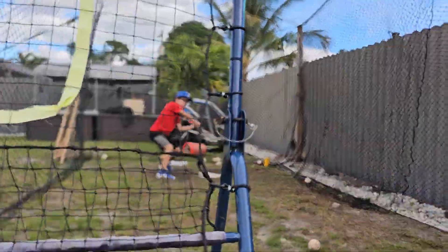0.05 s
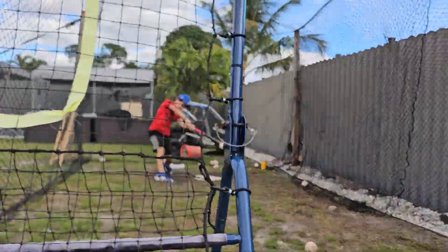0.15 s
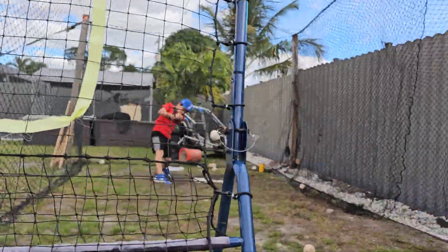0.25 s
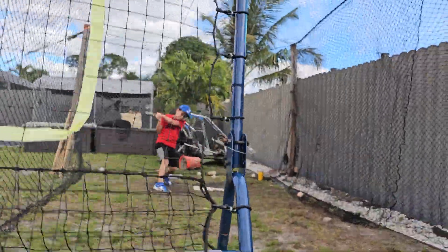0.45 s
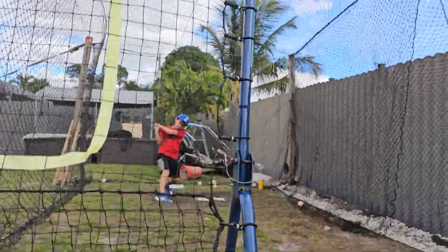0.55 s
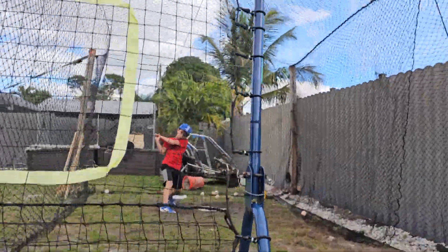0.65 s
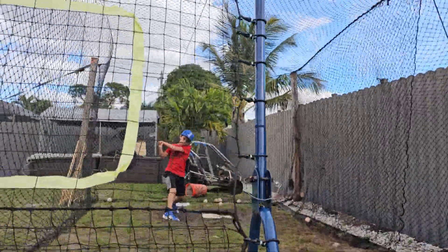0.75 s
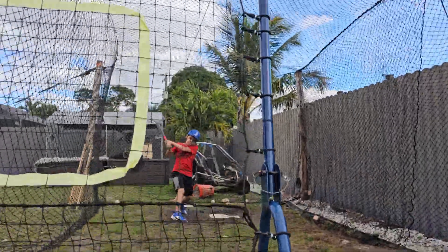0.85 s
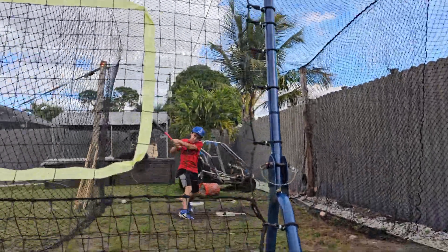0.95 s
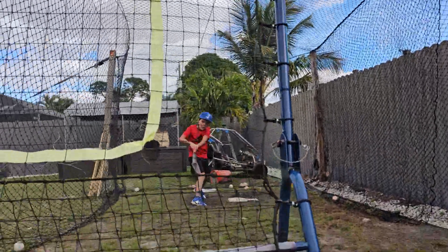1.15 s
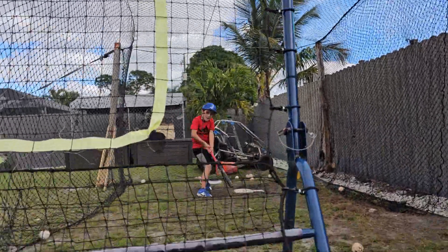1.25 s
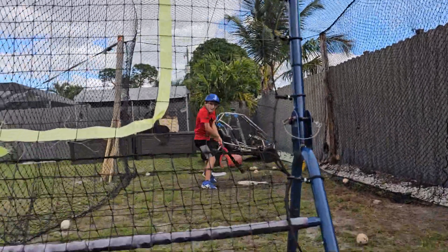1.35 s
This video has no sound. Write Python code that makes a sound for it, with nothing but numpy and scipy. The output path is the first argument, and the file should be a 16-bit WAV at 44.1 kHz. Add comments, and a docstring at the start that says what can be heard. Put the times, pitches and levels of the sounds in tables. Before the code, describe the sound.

A ball crashes into close netting, rattling and booming its tube frame, right after a faint machine thump and a sharp bat crack farther off. The ball thuds onto the grass, with faint distant traffic behind the yard.

```python
"""A batted ball slams into a net screen beside the microphone, in a backyard batting cage.
One cord snaps taut, the net rustles, the tube frame rattles and booms, the ball drops on the grass.
Just before, from across the yard, the pitching machine thumps and the bat cracks; the fences answer
with echoes and a short tail. Distant traffic rumble and air lie under it all."""
import sys
import numpy as np
from scipy import signal
from scipy.fft import rfft, irfft, next_fast_len
from scipy.io import wavfile
from scipy.ndimage import uniform_filter1d

SR = 44100
rng = np.random.default_rng(int(sys.argv[2]) if len(sys.argv) > 2 else 0)


def unload_wav(signal):
    """Save mono or channel-first audio to the path in sys.argv[1] as 16-bit WAV at rate SR, clipped to [-1, 1]."""
    wavfile.write(
        sys.argv[1],
        SR,
        np.round(np.clip(np.atleast_2d(signal).T, -1, 1) * 32767).astype(np.int16),
    )


N = 61739


def amp(db):
    return 10 ** (np.asarray(db) / 20)


def unit(x):
    return x / np.sqrt(np.mean(x ** 2) + 1e-20)


def along(points, hz):
    """Interpolate (Hz, value) points on a log axis."""
    f, v = np.transpose(points)
    return np.interp(np.log(hz + 1), np.log(f + 1), v)


def curves(rows):
    """A gate that opens at the first row and fades around the last, then each column per sample."""
    s, *cols = np.transpose(rows)
    t = np.arange(N) / SR
    gate = np.clip((t - s[0]) / 0.0024, 0, 1) * np.clip((s[-1] + 0.19 - t) / 0.22, 0, 1)
    return [gate] + [np.interp(t, s, c) for c in cols]


def filtered(x, response):
    """x through a complex frequency response."""
    m = next_fast_len(N + SR // 2)
    return irfft(rfft(x, m) * response(np.fft.rfftfreq(m, 1 / SR)), m)[..., :N]


def peak(f, centre_hz, width_hz):
    """A causal resonance."""
    return 1j * f * width_hz / (centre_hz ** 2 - f * f + 1j * f * width_hz + 1e-9)


def coloured(x, spectrum):
    """x at unit RMS, shaped by a spectrum that goes to -60 dB an octave beyond its ends."""
    points = [(spectrum[0][0] / 2, -60), *spectrum, (spectrum[-1][0] * 2, -60)]
    return unit(filtered(x, lambda f: amp(along(points, f))))


def stereo(rows, likeness, lag_s=0):
    """Mix two signals to a pair of given likeness; left arrives lag_s after right."""
    turn = lambda f: np.arccos(np.clip(along(likeness, f), -1, 1)) / 2
    mid, side = filtered(rows, lambda f: np.array([np.cos(turn(f)), np.sin(turn(f))]))
    lag = lambda f: np.exp(-1j * np.pi * f * lag_s * np.array([[1], [-1]]))
    return filtered(np.array([mid + side, mid - side]), lag)


def clicks(per_s, spread_db):
    """Two rows of random impulses with a long-tailed size."""
    hit = rng.random((2, N)) < per_s / SR
    return hit * rng.choice([-1, 1], (2, N)) * amp(spread_db * rng.exponential(size=(2, N)))


def burst(start_s, db, t60):
    """Two rows of noise that start at once and die away."""
    t = np.arange(N) / SR - start_s
    return rng.standard_normal((2, N)) * (t >= 0) * amp(db - 60 * np.abs(t) / t60)


# Far sound at the microphone: (frequency [Hz], left-right likeness [0-1])
FAR_LIKENESS = [(60, 0.88), (500, 0.365), (2000, 0.33), (10000, .2)]
# Spectrum of traffic and air: (frequency [Hz], relative level [dB])
AMBIENCE = [(20, -22.5), (63, 4), (90, -9), (150, -13.5), (240, -19), (430, -36), (950, -38), (1900, -36.5),
            (3500, -56), (8000, -58), (16000, -63.5)]
# Swell of the distant traffic: (time [s], level [dB])
RUMBLE = [(0, -32.5), (.1, -41.5), (.17, -42), (.55, -40), (.9, -46.5), (1.06, -47.5), (1.2, -48),
          (1.4, -47)]
def traffic_and_air(rumble_top_hz=261, air_db=-39.5):
    """Far beyond the fence, traffic swells under steady air; random patches shift the colour."""
    spectra = signal.stft(rng.standard_normal((2, N)), nperseg=1024)[2]
    patches = uniform_filter1d(uniform_filter1d(rng.standard_normal(spectra.shape[1:]), 5, 0), 6, 1)
    noise = signal.istft(spectra * amp(3.7 * unit(patches)), nperseg=1024)[1][:, :N]
    bed = stereo(coloured(noise, AMBIENCE), FAR_LIKENESS, lag_s=0.00018)
    rumble = filtered(bed, lambda f: 1 / (1 + (f / rumble_top_hz) ** 4))
    return amp([[.7], [-.7]]) * (amp(curves(RUMBLE)[1]) * rumble + amp(air_db) * (bed - rumble))


NET_LAG_S = 0.0002995  # the net's sound reaches the right channel first
# Stray ticks and knocks, the first a low boom under the bat's far echo: (time [s], level [dB], pitch [Hz],
# width [Hz], t60 [s])
TICKS = [(0.279, -41.5, 255, 122, .2), (1.297, -55, 8500, 13000, 0.18), (1.328, -57.5, 3000, 785, 0.046),
         (1.119, -60.5, 9200, 9270, 0.05), (.66, -39, 1700, 2000, .04), (.762, -46, 1900, 1800, .05),
         (.812, -35, 135, 60, .3), (.876, -36, 135, 55, .3), (1.119, -47, 330, 300, 0.12),
         (1.131, -57, 4500, 1200, .025), (1.155, -43, 115, 90, 0.8), (1.157, -47, 870, 200, 0.035),
         (1.157, -57, 3600, 3000, .025), (1.173, -50, 2600, 2800, 0.03)]
def ticks():
    """Small separate noises around the yard and, close by, as net and ball settle; the first row adds a low
    boom under the far echo of the bat crack."""
    x = sum(filtered(burst(s, db, t60), lambda f: peak(f, hz, width) ** 2 * np.sqrt(SR / width))
            for s, db, hz, width, t60 in TICKS)
    return stereo(x, [(1000, 0.9)], NET_LAG_S)


# Decay between the fences, before stretch: (frequency [Hz], t60 [s])
YARD_DECAY = [(200, 0.27), (1500, 0.62), (4000, 0.6), (12000, 0.44)]
# Colour of that tail: (frequency [Hz], relative level [dB])
YARD_COLOUR = [(88, -26.5), (190, 8.5), (259, -0.5), (998, -5), (2100, -1.5), (2870, -11.5), (7320, -15.5),
               (16000, -30)]
def yard_tail(knock_s, tilt_db, stretch, gap_s=0.0049):
    """The fences scatter a knock into a diffuse tail that arrives just behind it."""
    hz, t, spectra = signal.stft(rng.standard_normal((2, N)), SR, nperseg=256)
    colour_db = along(YARD_COLOUR, hz) + tilt_db * abs(np.log2(hz / 1000 + 0.54))
    decay_db = 60 * t / stretch / along(YARD_DECAY, hz)[:, None]
    tail = signal.istft(spectra * amp(colour_db[:, None] - decay_db), SR, nperseg=256)[1]
    start = round((knock_s + gap_s) * SR)
    return np.pad(tail / np.std(tail[:, :SR // 20]), ((0, 0), (start, 0)))[:, :N]


# Ring of a hard knock: (frequency [Hz], relative level [dB], t60 [s])
KNOCK_MODES = [(269, -7.5, 0.034), (495, -11.5, 0.034), (757, -3, 0.019), (1340, 7.5, 0.0045),
               (2235, -9, 0.025), (2860, -15.5, 0.033), (3677, -15, 0.03), (4590, -14.5, 0.0095),
               (6570, -0.5, 0.0019)]
def knock(tilt_db, rise_cycles=0.36):
    """A hard blow rings a few short modes, with a puff of contact noise."""
    t, ring = np.arange(SR // 8) / SR, 0
    for k, (hz, db, t60) in enumerate(KNOCK_MODES):
        rise = 1 - np.exp(-t * hz / rise_cycles)
        decay = amp(db + tilt_db * abs(np.log2(hz / 1000)) - 60 * t / t60)
        ring += (-1) ** k * rise * decay * np.sin(2 * np.pi * hz * t)
    return ring + 0.23 * amp(1.14 * tilt_db - 60 * t / 0.016) * rng.standard_normal(len(t))


# Machine thump, then bat crack: (time [s])
BLOW_TIMES = [.002, .2329]
# The same two: (level [dB], tilt away from 1 kHz [dB/octave], tail [dB], far echo [dB], tail stretch [x])
BLOWS = [(-25, -7.5, -44, -30, 0.14), (-8, 1.5, -33, -23.5, 1)]
# Early reflections: (delay [s], left [dB], right [dB], dulling corner [Hz])
REFLECTIONS = [(.0047, -4, -7, 9000), (.0094, -11, -11, 6000)]
def machine_and_bat(far_echo_s=.0472):
    """Across the yard the machine thumps and the bat cracks; near and far fences return each blow."""
    direct, slap = np.zeros((2, N + SR))
    tails = 0
    for s, (db, tilt_db, tail_db, echo_db, stretch) in zip(BLOW_TIMES, BLOWS):
        ring = knock(tilt_db)
        direct[round(s * SR):][:len(ring)] += amp(db) * ring
        slap[round((s + far_echo_s) * SR):][:len(ring)] += amp(echo_db) * ring
        tails += amp(tail_db) * yard_tail(s, tilt_db, stretch)
    paths = lambda f: 1 + sum(
        amp([[left], [right]]) * np.exp(-2j * np.pi * f * delay) / (1 + 1j * f / hz) ** 2
        for delay, left, right, hz in REFLECTIONS)
    far_fence = filtered(slap[:N], lambda f: paths(f) * peak(f, 1300, width_hz=1400) ** 2)
    return filtered(direct[:N], paths) + far_fence + stereo(tails, FAR_LIKENESS)


# Boom of frame and ground: (time [s], deep level [dB], thud level [dB])
BOOM_LEVELS = [(0.42, -28, -49), (0.434, -24.5, -20.5), (0.454, -24, -26), (0.48, -36, -41),
               (0.498, -51, -35), (0.606, -83, -60.5), (0.628, -44, -37.5), (0.658, -46, -55),
               (0.72, -37, -63), (0.758, -46, -47.5), (0.778, -51, -28.5), (0.835, -61, -43),
               (0.87, -64, -55), (0.96, -73, -50.5)]
# Spectra of its two bands: (frequency [Hz], relative level [dB])
DEEP_BAND = [(20, 12), (36, 4.5), (75, -14), (110, -5), (200, -41.5)]
THUD_BAND = [(90, -6.5), (135, 3.5), (180, -8.5), (260, -2), (400, -16), (700, -24.5)]
def boom():
    """Low thumps near the microphone as the frame rocks and the ball lands on the grass."""
    gate, deep_db, thud_db = curves(BOOM_LEVELS)
    deep = amp(deep_db) * coloured(rng.standard_normal((2, N)), DEEP_BAND)
    thud = amp(thud_db) * coloured(rng.standard_normal((2, N)), THUD_BAND)
    return stereo(gate * (deep + thud), [(100, 0.98)]) * amp([[.8], [-.8]])


# Modes of the tube frame's fittings: (frequency [Hz], width [Hz], gain [dB])
FRAME_MODES = [(1032, 120, -3), (1253, 15, -9.5), (1793, 200, 7.5), (2076, 32, -5.5), (3936, 77, -4),
               (4550, 91, 3.5), (4960, 90, -3), (5456, 120, 0.5), (6196, 130, 5), (7240, 140, 8),
               (11250, 270, 6)]
# Jolts of the frame: (time [s], level [dB], pitch of the part struck [Hz], 1/e decay [s])
FRAME_JOLTS = [(0.442, -34.5, 1930, 0.058), (.444, -10.5, 1134, 0.0099), (.456, -28, 4600, 0.0088),
               (0.456, -15, 5670, 0.0091), (0.467, -21, 2120, 0.024), (0.489, -30.5, 11400, 0.011),
               (0.507, -23.5, 3750, 0.014), (.513, -31, 1810, 0.0092), (0.534, -32.5, 1790, 0.019),
               (.543, -26, 1047, 0.014), (0.559, -38, 5930, 0.018), (.562, -32, 1860, 0.012),
               (.681, -39.5, 11600, 0.0057), (0.708, -49, 11400, 0.0045), (0.801, -46, 1850, 0.0087),
               (1.292, -58.5, 5640, 0.025)]
def fittings(reach_octaves=.15):
    """Each jolt scrapes the frame briefly and rings the modes near the pitch of the part struck."""
    t, rattle = np.arange(N) / SR, 0
    for s, db, part_hz, decay_s in FRAME_JOLTS:
        scrape = rng.standard_normal((2, N)) * (t >= s) * np.exp(-np.abs(t - s) / decay_s) * amp(db)
        near = lambda hz: np.exp(-(np.log2(hz / part_hz) / reach_octaves) ** 2)
        modes = lambda f: sum(amp(gain) * near(hz) * np.sqrt(SR / width / 4) * peak(f, hz, width)
                              for hz, width, gain in FRAME_MODES)
        rattle += filtered(scrape, modes)
    return rattle


# Ring of the taut cord: (frequency [Hz], relative level [dB], t60 [s])
CORD_MODES = [(3660, -28, 0.0083), (5430, -9.5, 0.0059), (6350, 10.5, 0.0023), (12500, -6.5, 0.0035)]
def cord_snap(start_s=.4231, ring_db=-14.5):
    """The ball first plucks one cord, close up: a short bright ring and a fizz."""
    t = np.clip(np.arange(N) / SR - start_s, 0, None)
    ring = sum(amp(ring_db + db - 60 * t / t60) * np.sin(2 * np.pi * hz * t) for hz, db, t60 in CORD_MODES)
    fizz = filtered(burst(start_s, db=-19, t60=0.015), lambda f: peak(f, 4700, 9000) ** 2)
    return ring * [[1], [.2]] + fizz


# Shaking of the screen: (time [s], rustle [dB], clatter over rustle [dB], left over right [dB])
SHAKING = [(.425, -35.5, 4.5, 9.5), (.437, -21.5, -1.5, -8.5), (.452, -18.5, -4.5, 5), (.461, -19, -7.5, 0),
           (.478, -22.5, -15.5, -0.5), (.5, -29, -4, -0.5), (.524, -35, 0.5, -3.5), (.535, -33, -5, 1),
           (.568, -33, -1, 1), (.595, -43.5, -10, -7.5), (.606, -40, -2.5, 1.5), (.632, -42, 0.5, -0.5),
           (.655, -46, -3.5, -10), (.661, -46, 5.5, 15.5), (.672, -42, 8.5, -3), (.682, -35, 0, -4),
           (.7, -50.5, -1, -0.5), (.755, -59, 1, -0.5), (.768, -42, -2, 0), (.85, -51.5, 1.5, 0),
           (.94, -63, -3, -0.5), (1.4, -77.5, 11.5, -1.5)]
# Spectra of cord rustle and frame clatter: (frequency [Hz], relative level [dB])
CORD_BAND = [(1290, -15), (2200, -3), (2550, -24.5), (3470, -11.5), (5220, -7.5), (6370, -9), (11100, -14),
             (16000, -13.5)]
CLATTER_BAND = [(240, -41.5), (400, -8), (1850, -7.5), (3500, -7.5), (4550, -47), (7700, -120)]
# The net at close range: (frequency [Hz], left-right likeness [0-1])
NET_LIKENESS = [(500, 0.9), (1200, 0.25), (3000, 0.057)]
def net_screen(grain_db=-6, clink_db=-10.5, jingle_db=-6.5, clink_decay_s=.004):
    """The ball hits beside the microphone: cords rustle, clinks roughen them and jingle the frame."""
    gate, level_db, clatter_db, pan_db = curves(SHAKING)
    clink_shape = np.exp(-np.arange(SR // 20) / SR / clink_decay_s)
    contacts = np.abs(clicks(per_s=90, spread_db=4)[0])
    clinks = np.minimum(signal.fftconvolve(contacts, clink_shape)[:N], 3)
    grains = lambda: rng.standard_normal((2, N)) + amp(grain_db) * unit(clicks(per_s=3000, spread_db=2.5))
    roughness = unit(1 + amp(clink_db) * clinks)
    cords = coloured(grains(), CORD_BAND)
    clatter = coloured(grains(), CLATTER_BAND) * amp(clatter_db)
    frame = lambda f: sum(amp(gain) * peak(f, hz, width) for hz, width, gain in FRAME_MODES)
    jingle = amp(jingle_db) * unit(filtered(clinks * grains(), frame))
    shake = gate * amp(level_db) * (roughness * (cords + clatter) + jingle)
    impact = shake + fittings() + cord_snap()
    return stereo(impact, NET_LIKENESS, NET_LAG_S) * amp([pan_db / 2, -pan_db / 2])


def scene():
    """One pitch and one hit, heard from beside the screen."""
    return machine_and_bat() + net_screen() + boom() + ticks() + traffic_and_air()


def record(dry):
    """The camera's stereo microphone track keeps nothing above its band limit."""
    top_hz, edge_hz = 15800, 700
    return filtered(dry, lambda hz: np.clip((top_hz - hz) / edge_hz + .5, 0, 1) ** 2)


dry = scene()
out = record(dry)
unload_wav(out)
```